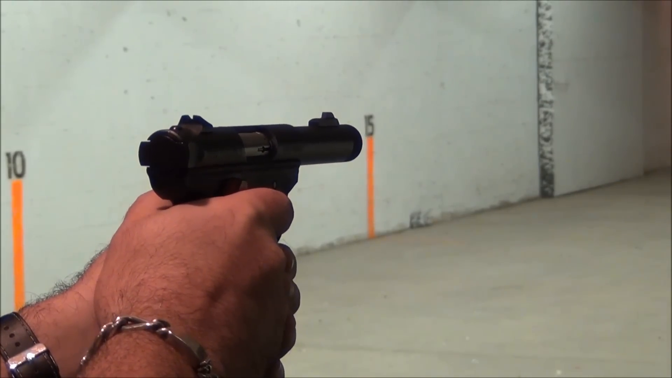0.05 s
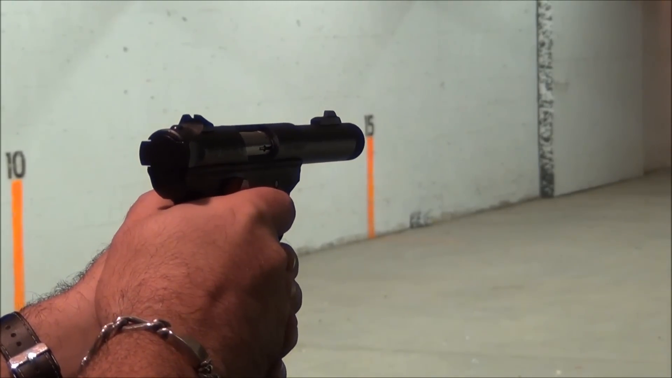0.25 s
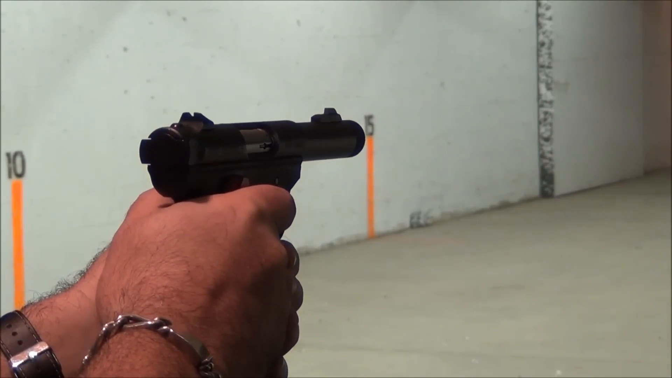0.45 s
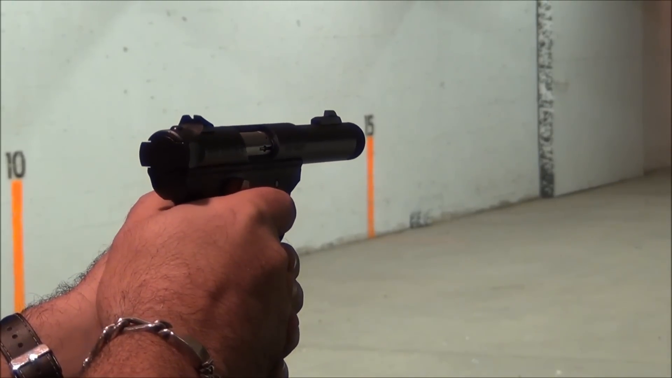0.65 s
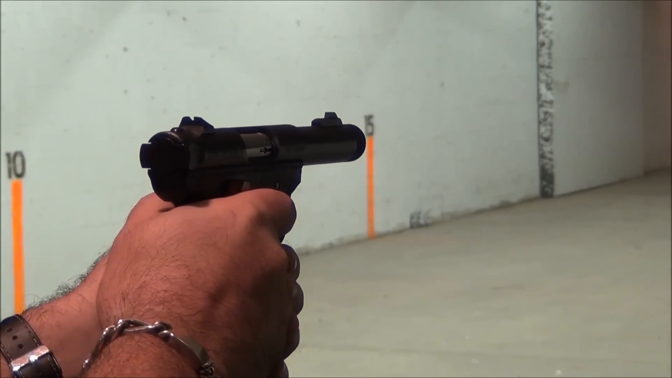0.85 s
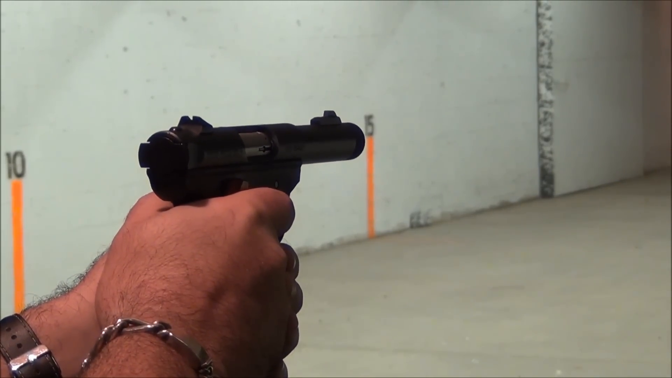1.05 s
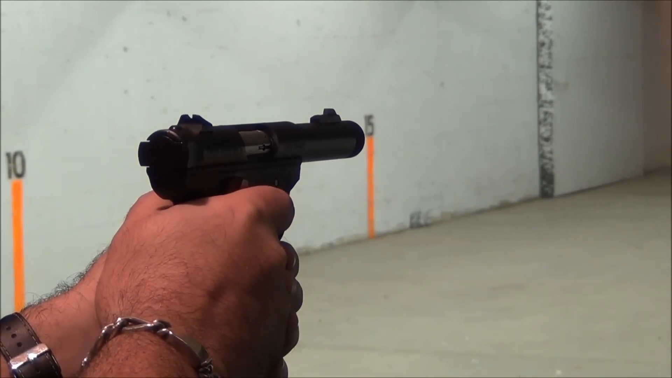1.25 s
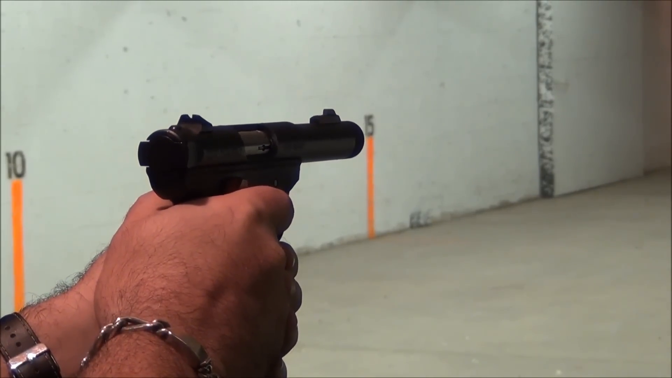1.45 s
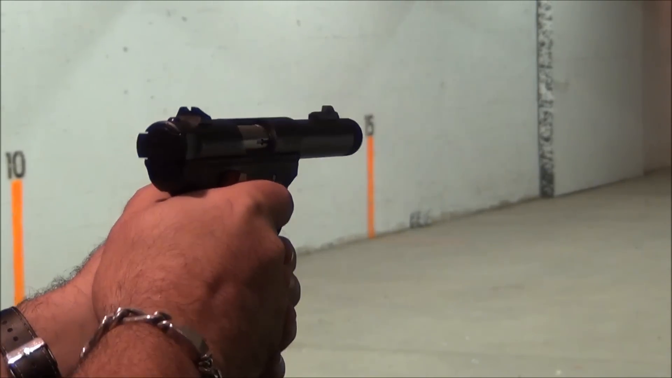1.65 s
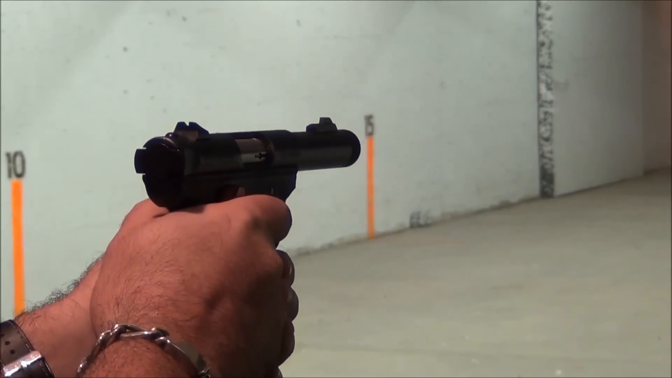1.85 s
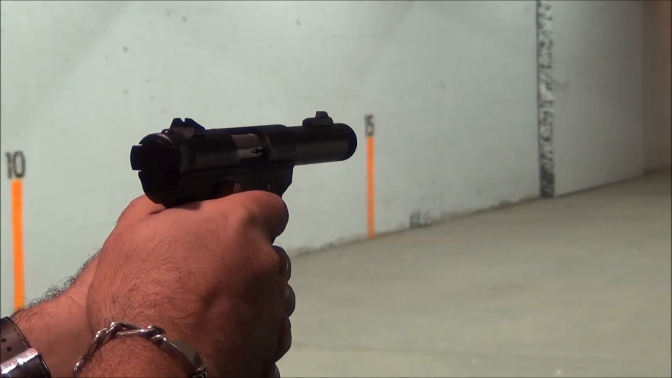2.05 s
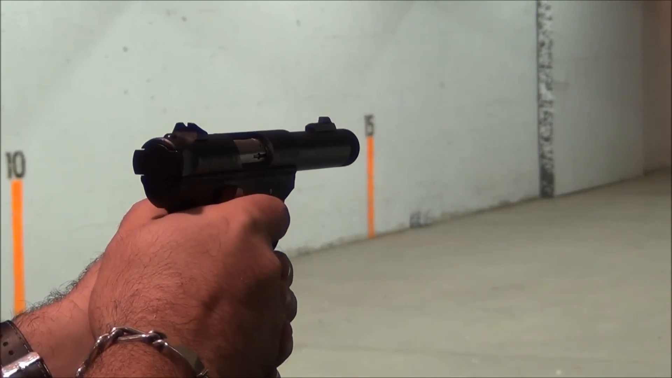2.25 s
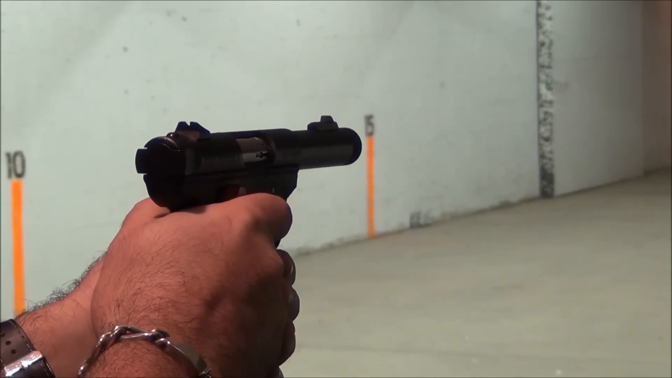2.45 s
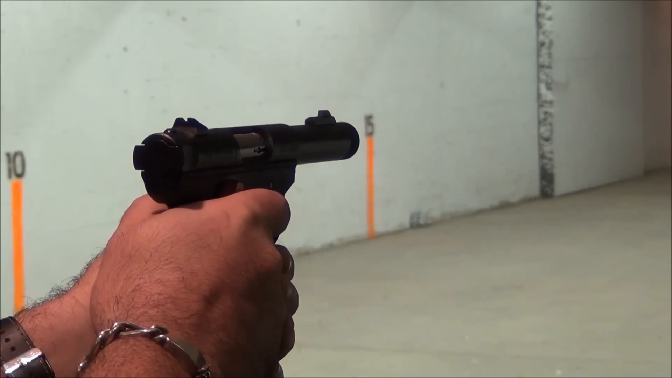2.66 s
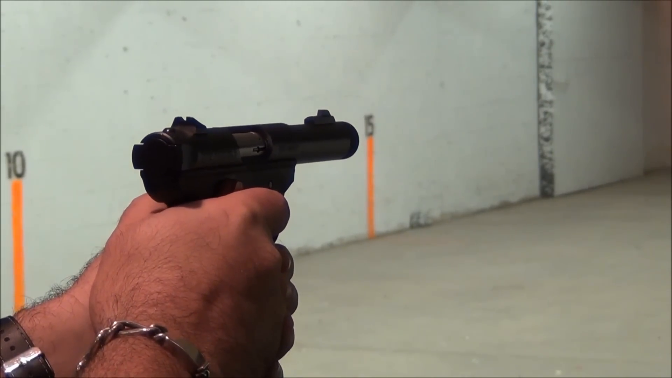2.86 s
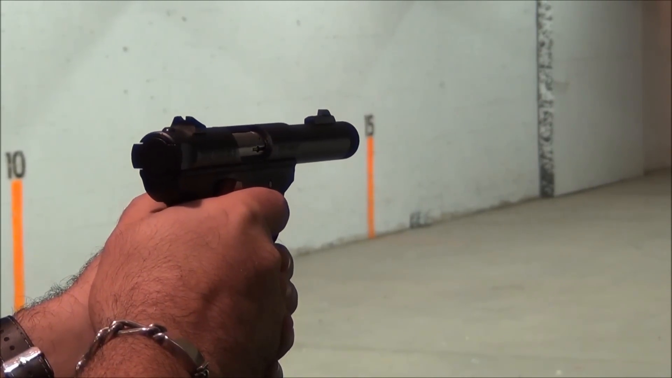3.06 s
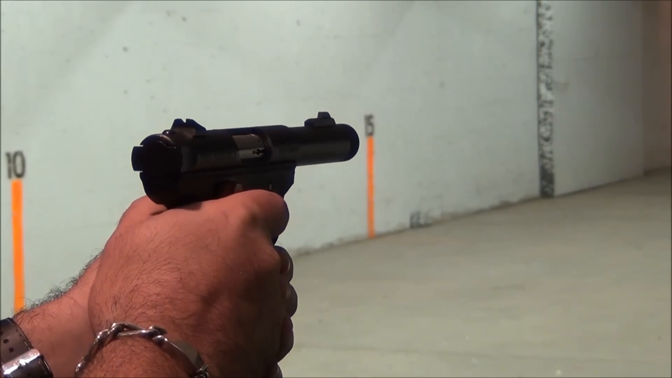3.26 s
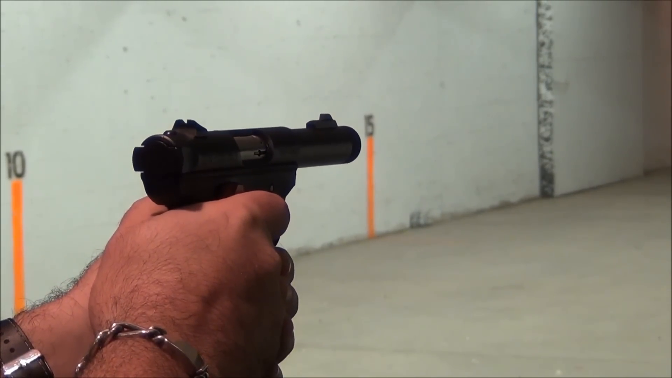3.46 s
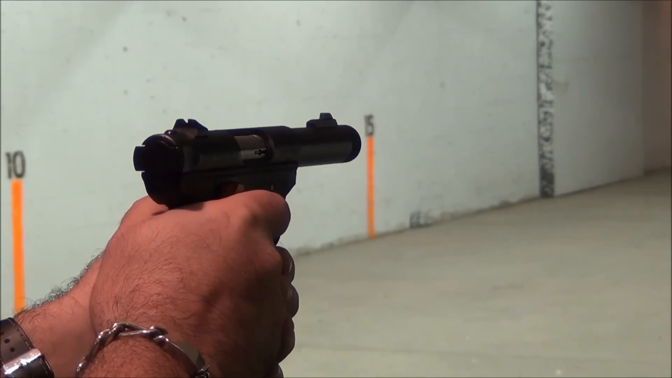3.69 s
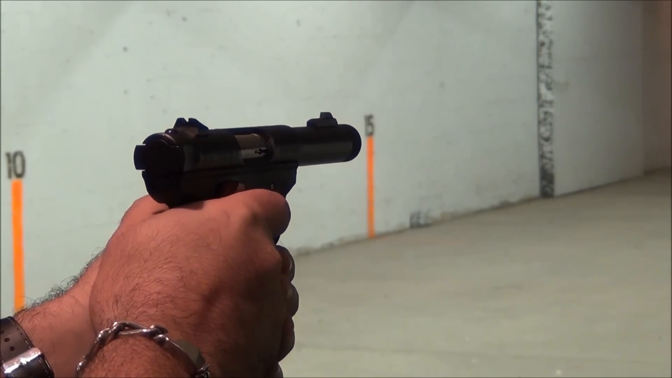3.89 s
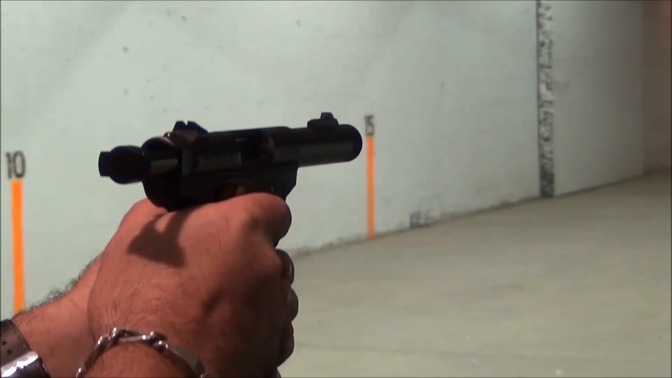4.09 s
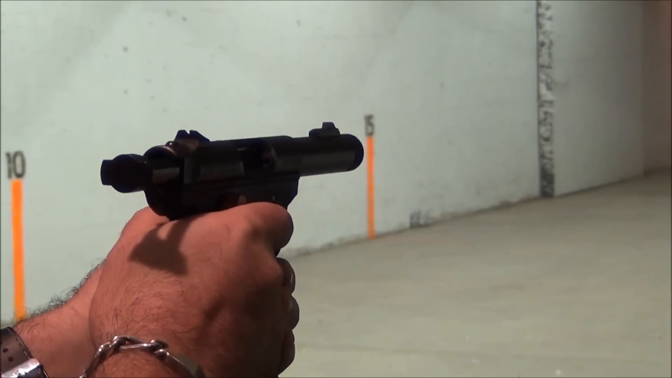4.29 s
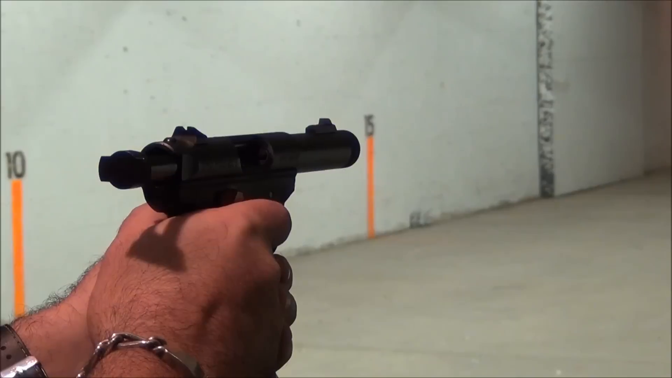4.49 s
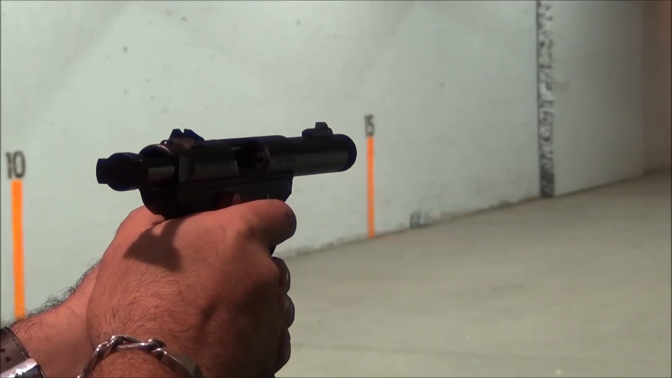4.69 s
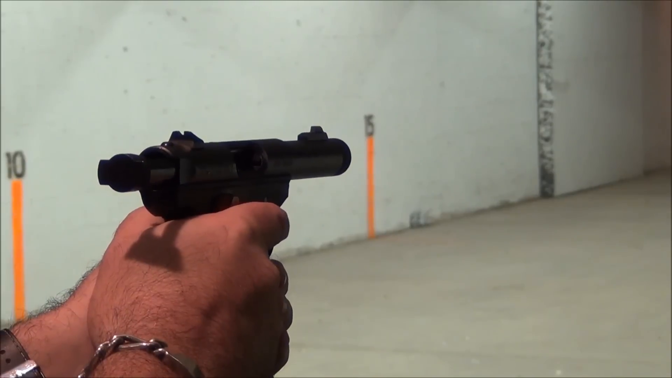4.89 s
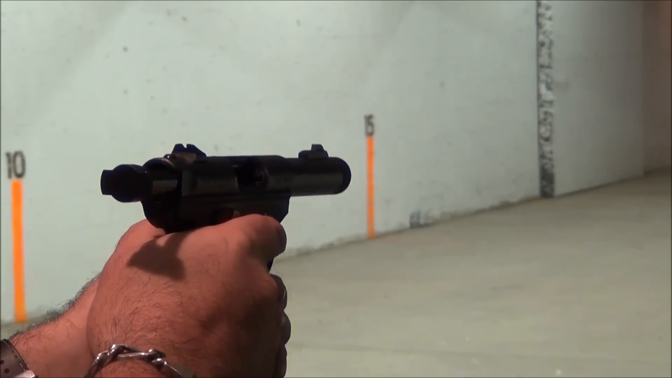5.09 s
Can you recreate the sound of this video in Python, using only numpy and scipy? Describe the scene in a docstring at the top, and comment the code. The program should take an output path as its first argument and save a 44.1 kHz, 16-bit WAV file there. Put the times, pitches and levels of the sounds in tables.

```python
"""Two shots from a small-bore pistol in a concrete indoor range, heard by a close microphone.
First the ventilation creeps up, with pings of spent brass on the floor and small ticks and scuffs.
At 1.6 s the hammer clicks, the muzzle blast overloads the microphone and the action clacks shut.
The hall reverberates in a long roar, held flat by gain control, and more brass lands and rings.
At 4.0 s the second shot raises the same echoes, which die away into the ventilation."""
import sys
import numpy as np
from scipy import signal
from scipy.fft import irfft
from scipy.io import wavfile
from scipy.ndimage import uniform_filter1d

SR = 44100
rng = np.random.default_rng(int(sys.argv[2]) if len(sys.argv) > 2 else 0)


def wav_out(sig):
    """Save sig, one row per channel (or a flat mono array), as 16-bit PCM at SR to the path in sys.argv[1]."""
    wavfile.write(sys.argv[1], SR, np.round(np.clip(np.atleast_2d(sig).T, -1, 1) * 32767).astype(np.int16))


N = 226365


def amp(db):
    """Amplitude ratio of a level in decibels."""
    return 10 ** (np.asarray(db) / 20)


def unit(x):
    """Normalisation to rms 1."""
    return x / np.sqrt(np.mean(x ** 2) + 1e-20)


def read(points, hz):
    """Interpolation on a log-frequency axis."""
    f, value = np.transpose(points)
    return np.interp(np.log(hz + 1), np.log(f + 1), value)


def add(mix, s, sound):
    """Superposition of a sound on the mix at time s."""
    part = mix[:, max(round(s * SR), 0):][:, :sound.shape[-1]]
    part += sound[..., :part.shape[1]]


def noise_bins(spectrum, size, width):
    """Partial coherence: a random-phase spectrum reaches two close capsules as mid plus or minus side."""
    hz = np.fft.rfftfreq(size, 1 / SR)
    mid, side = np.exp(2j * np.pi * rng.random((2, len(hz))))
    side = side * amp(read(width, hz))
    return hz, np.array([mid + side, mid - side]) * amp(read(spectrum, hz))


# stereo width of quiet sounds from all around: (frequency [Hz], side re mid [dB])
AMBIENT_WIDTH = [(100, -51), (250, -50), (400, -38), (700, -15.5), (1200, -12.5), (2400, -14), (4400, -9),
                 (8000, -8.5), (13000, -23)]
def noise(spectrum, size, width=AMBIENT_WIDTH):
    """Fourier synthesis of coloured stereo noise of rms 1."""
    _, bins = noise_bins(spectrum, size, width)
    return unit(irfft(bins, size))


def burst(spectrum, rise_s, decay_s, width=AMBIENT_WIDTH):
    """A noise transient with exponential growth and decay."""
    t = np.arange(SR // 2) / SR
    return noise(spectrum, len(t), width) * (1 - np.exp(-t / rise_s)) * np.exp(-t / decay_s)


def ring(modes):
    """Free vibration of a struck body: a sum of damped modes."""
    t = np.arange(SR // 2) / SR
    return sum(amp(db - 60 * t / t60) * np.sin(2 * np.pi * (hz * t + rng.random()))
               for hz, db, t60 in modes)


# spectrum of the air handling: (frequency [Hz], relative density [dB])
VENT_SPECTRUM = [(15, -43), (25, -13.5), (71, -1.5), (178, -3), (305, -5.5), (349, -7), (399, -9),
                 (482, -7), (871, -13), (1800, -16.5), (3260, -28.5), (3930, -29.5), (7910, -39.5),
                 (13200, -40.5), (15500, -61)]
def ventilation(level_db=-51, waver_db=0.5):
    """Broadband flow noise with a slight random amplitude modulation."""
    waver = unit(uniform_filter1d(rng.standard_normal(N), SR // 10))
    return amp(level_db + waver_db * waver) * noise(VENT_SPECTRUM, N)


# spectrum of a small contact: (frequency [Hz], relative density [dB])
CONTACT_SPECTRUM = [(300, -23), (2500, -8), (3400, -1.5), (4200, 3.5), (5800, -1.5), (8000, -4),
                    (13500, -2.5), (16000, -8)]
# metallic modes rung by a tick: (frequency [Hz], relative level [dB], T60 [s])
TICK_MODES = [(3900, 4, .5), (4120, -1.5, 0.44), (4450, -3, .4), (5230, -3, .4), (5700, 3, .4),
              (5950, -4, .3), (6430, -4, .4)]
def tick(wash_db=-18, ring_db=-37):
    """Impulse response of a tiny contact: a click, a brief wash and a faint ring."""
    click = burst(CONTACT_SPECTRUM, rise_s=0.00021, decay_s=0.00072)
    wash = burst(CONTACT_SPECTRUM, rise_s=0.00089, decay_s=0.01)
    return click + amp(wash_db) * wash + amp(ring_db) * ring(TICK_MODES)


# single sharp contacts: (time [s], relative level [dB])
TICK_EVENTS = [(1.0545, -48), (1.1508, -50), (2.3493, -33), (3.5119, -51), (4.931, -48)]
def ticks(gain_db=4):
    """Impulsive excitation: isolated contacts sound one tick each."""
    out = np.zeros((2, N))
    for s, db in TICK_EVENTS:
        add(out, s, amp(db + gain_db) * tick())
    return out


def swish_envelope(per_s=13, spread_db=7, decay_s=0.038, count=120):
    """Exponential relaxation after unevenly spaced kicks: the envelope of faint swishes, of rms 1."""
    step, size = rng.random((count, 2)).T
    onsets = np.cumsum(step + .5) / per_s * SR
    kicks = np.bincount(onsets.astype(int), amp(spread_db * (2 * size - 1)), N)[:N]
    return unit(signal.lfilter([1], [1, -np.exp(-1 / (decay_s * SR))], kicks))


# the louder scuffs: (time [s], relative level [dB], decay time [s])
SCUFF_EVENTS = [(.652, -63.5, 0.13), (1.054, -61.5, 0.097), (1.197, -62, 0.024), (2.494, -57, 0.022),
                (2.586, -55.5, 0.017), (2.88, -61.5, 0.025), (3.52, -64, 0.034), (3.724, -60, 0.04),
                (3.812, -59.5, 0.047), (4.932, -62.5, 0.083)]
def scuffs(gain_db=1, rise_s=0.003, grains_per_s=250, spread_db=2.5, idle_db=-72, contacts=4):
    """Friction noise: a few points of contact each give a random train of tiny ticks."""
    out, t = np.zeros((2, N)), np.arange(N) / SR
    rubbing = amp(idle_db) * swish_envelope()
    for s, db, decay_s in SCUFF_EVENTS:
        age = np.maximum(t - s, 0)
        rubbing += amp(db + gain_db) * (1 - np.exp(-age / rise_s)) * np.exp(-age / decay_s)
    for _ in range(contacts):
        sizes = amp(spread_db * np.minimum(rng.exponential(1, N), 3)) * rng.choice([-1, 1], N)
        grains = unit(sizes * (rng.random(N) < grains_per_s / SR)) * rubbing
        response = tick()
        response /= np.linalg.norm(response[0])
        out += signal.oaconvolve(grains[None], response, axes=1)[:, :N] / np.sqrt(contacts)
    return out


# ringing and knocking modes of a case: (frequency [Hz], relative level [dB], T60 [s])
RING_MODES = [(12000, -1, 0.11), (11900, -13, 0.11)]
KNOCK_MODES = [(5530, -2, .015), (5720, 2, 0.024), (6270, -2, 0.016)]
# spent cases landing: (time [s], relative level [dB], knock offset [dB])
LANDINGS = [(0.1044, -51, -11), (0.2822, -59, 2), (0.3935, -65.5, 2), (2.3285, -50, -6), (2.3314, -48, -7),
            (3.1941, -62, -9), (3.4057, -63, -16), (3.4565, -58, -14), (4.8668, -60, -4)]
def brass(knock_db=5, contact_db=-4):
    """Impact on concrete excites the modes of an empty case: a tick, a short knock, a thin high ring."""
    out = np.zeros((2, N))
    for s, db, offset_db in LANDINGS:
        metal = ring(RING_MODES) + amp(offset_db + knock_db) * ring(KNOCK_MODES)
        contact = burst(CONTACT_SPECTRUM, rise_s=0.0002, decay_s=0.0058)
        add(out, s, amp(db) * (metal + amp(contact_db) * contact))
    return out


def wander(t, per_s):
    """Random fluctuation of rms 1, with per_s fresh values a second."""
    values = rng.standard_normal(2048)
    return unit(np.interp(t * per_s, np.arange(len(values)), values))


# echo paths across the hall's height, width, firing booths and length: (round trip [s],
# half duration [s], centre [Hz], half bandwidth [octaves], first lift [dB], lift kept per trip [ratio])
ECHO_PATHS = [(0.009, 0.0054, 793, 0.58, 8.5, .15), (0.0315, 0.019, 266, 0.82, 11.5, .5),
              (0.055, 0.014, 1900, 0.7, 4, .6), (.159, 0.012, 1150, 2.3, 4.5, 0.27)]
def flutter_db(t, hz, count=4):
    """Flutter echo: facing surfaces lift a band's level once each round trip, less every time."""
    trips = np.arange(count)[:, None]
    lift = 0
    for trip_s, half_s, centre, octaves, db, kept in ECHO_PATHS:
        returns = kept ** trips * np.exp(-((t - (trips + 1) * trip_s) / half_s) ** 2)
        in_band = np.exp(-(np.log2(hz / centre) / octaves) ** 2)
        lift += db * returns.sum(0) * in_band
    return lift


# stereo width of the shots: (frequency [Hz], side re mid [dB])
SHOT_WIDTH = [(40, -27), (150, -37), (280, -42.5), (500, -26.5), (1000, -17), (2200, -15.5), (4500, -14),
              (8000, -17.5), (11000, -55)]
# strongest standing waves of the hall: (frequency [Hz], lift [dB])
ROOM_MODES = [(324, 3.5), (432, 5), (475, 3.5), (545, 6.5), (607, 3), (679, 5), (718, 2.5), (834, 4),
              (886, 3), (930, 6.5), (976, 2), (1080, 1), (1136, 3.5), (1228, 5), (1337, 5.5), (1432, 3.5),
              (1909, 7.5), (3135, 5.5)]
# reverberation bands: (frequency [Hz], relative initial density [dB], T60 [s])
HALL_BANDS = [(25, -42, 1), (51.2, -14.5, 0.86), (102, -11.5, 0.83), (200, -10, 1.334), (376, 0, 1.36),
              (533, -1.5, 1.4), (787, 2, 1.305), (1506, -3.5, 1.244), (2410, -14, 1.23), (3370, -15, 1.18),
              (5360, -20, 0.97), (8660, -20, 0.77), (12250, -25.5, 0.6), (16000, -32.5, 0.43)]
def roar(build_s=0.01, build_cycles=0.7, mode_width_hz=7, scatter_db=1.0, scatter_per_s=70):
    """Reverberation: each band builds up, swells with wall echoes and decays at its own rate."""
    t = np.arange(2 * SR) / SR
    hz, bins = noise_bins([row[:2] for row in HALL_BANDS], len(t), SHOT_WIDTH)
    bins *= amp(sum(db * np.exp(-((hz - f) / mode_width_hz) ** 2 / 2) for f, db in ROOM_MODES))
    bins /= irfft(bins).std()
    centres, out = [row[0] for row in HALL_BANDS], 0
    for (f, _, t60), share in zip(HALL_BANDS, np.eye(len(HALL_BANDS))):
        band = irfft(bins * read(list(zip(centres, share)), hz))
        echo_db = flutter_db(t, f) + scatter_db * wander(t, scatter_per_s)  # stray echoes bunch by chance
        build = 1 - np.exp(-t / (build_s + build_cycles / f))  # bass needs longer to fill the hall
        out += band * build * amp(echo_db - 60 * t / t60)
    return out


# spectrum of the crack: (frequency [Hz], relative density [dB])
CRACK_SPECTRUM = [(60, -13.5), (250, -12), (700, -37), (1500, 5.5), (2200, 5.5), (3500, 3), (5800, -1.5),
                  (9000, -4), (14500, -11)]
def muzzle_crack(positive_phase_s=0.00028):
    """A Friedlander blast wave and its scatter off hands and booth saturate the microphone."""
    phase = np.arange(SR // 2) / SR / positive_phase_s
    pulse = (1 - phase) * np.exp(-phase)  # overpressure, then suction
    blast = pulse + burst(CRACK_SPECTRUM, rise_s=0.00029, decay_s=0.0087, width=SHOT_WIDTH)
    return blast / np.sqrt(1 + blast.mean(0) ** 2)


# the action, from hammer fall to closing bolt: (time from shot [s], relative level [dB], decay time [s])
ACTION_CLACKS = [(-.0053, -48.5, 0.0045), (-.0018, -25, 0.0023), (0.017, -10.5, 0.00091),
                 (0.0193, -6, .005), (.0455, -11.5, 0.0055)]
# the shots: (time [s], relative level [dB])
SHOT_EVENTS = [(1.6075, 2.5), (3.9980, 1)]
def pistol(direct_db=3, roar_db=-3, clack_rise_s=0.00061):
    """Time invariance: gun and microphone stay in place, so both shots raise the same echoes."""
    crack, hall = muzzle_crack(), roar()
    clacks = [(delay, amp(db) * burst(CRACK_SPECTRUM, clack_rise_s, decay_s, SHOT_WIDTH))
              for delay, db, decay_s in ACTION_CLACKS]
    out = np.zeros((2, N))
    for s, db in SHOT_EVENTS:
        add(out, s, amp(db + direct_db) * crack)
        add(out, s, amp(db + roar_db) * hall)
        for delay, clack in clacks:
            add(out, s + delay, amp(db + direct_db) * clack)
    return out


def scene():
    """Superposition of all sources at the microphone."""
    return pistol() + brass() + ticks() + scuffs() + ventilation()


def hold(db, db_per_s):
    """Peak detection: follows each rise at once and falls back at a fixed rate."""
    fall = np.arange(N) * db_per_s / SR
    return np.maximum.accumulate(db + fall) - fall


def record(dry, threshold_db=-26, slope=0.71, slow_depth_db=8.0, start_duck_db=6.5,
           ceiling=0.46, cutoff_hz=15900):
    """Dynamic compression with a quick and a slow recovery, then soft clipping and a band limit."""
    power = abs(uniform_filter1d((dry ** 2).mean(0), size=260))
    reduction_db = slope * np.maximum(10 * np.log10(power + 1e-12) - threshold_db, 0)
    slow_db = np.minimum(reduction_db, slow_depth_db)
    slow_db[0] = max(slow_db[0], start_duck_db)  # the gain starts low, so the ventilation creeps up
    held_db = np.maximum(hold(reduction_db, db_per_s=130), hold(slow_db, db_per_s=3.9))
    duck_db = uniform_filter1d(held_db, size=60)
    clipped = ceiling * np.tanh(dry * amp(-duck_db) / ceiling)
    low_pass = signal.firwin(401, cutoff_hz, window=("kaiser", 8), fs=SR)
    return signal.oaconvolve(clipped, low_pass[None], "same")


dry = scene()
out = record(dry)
wav_out(out)
```